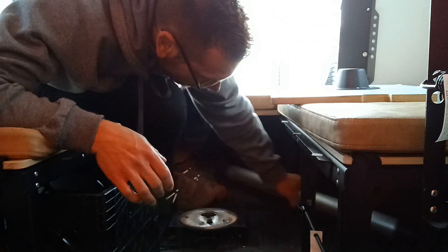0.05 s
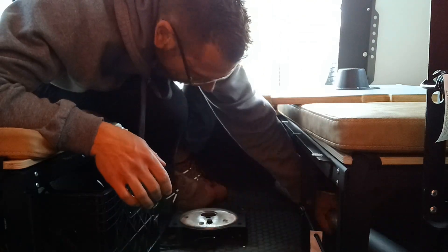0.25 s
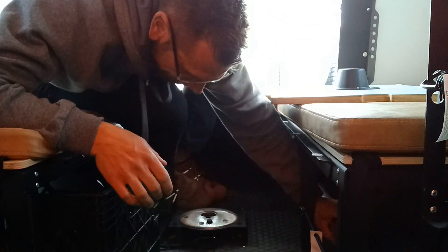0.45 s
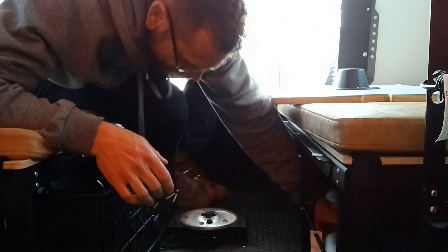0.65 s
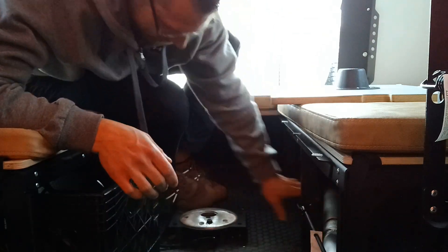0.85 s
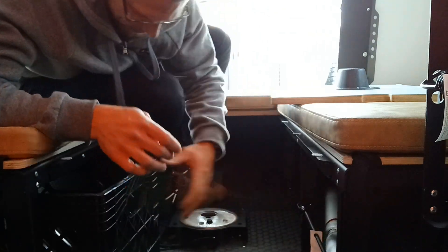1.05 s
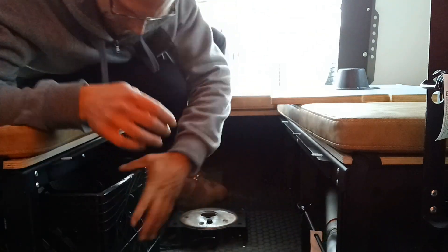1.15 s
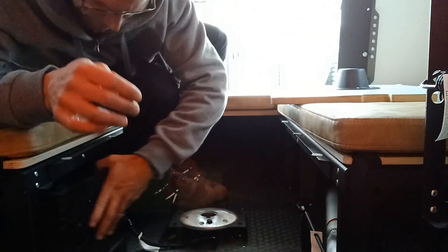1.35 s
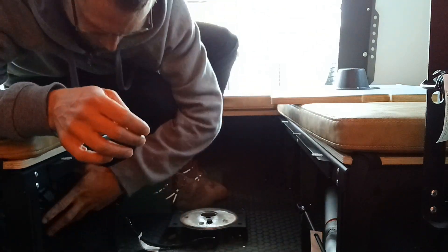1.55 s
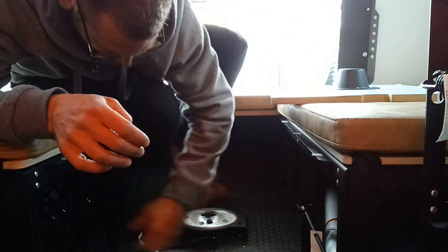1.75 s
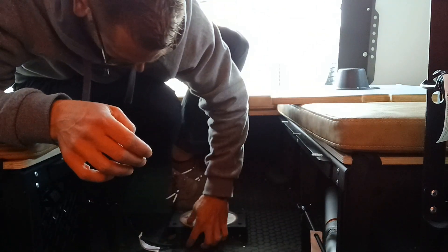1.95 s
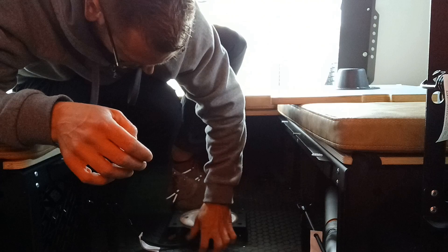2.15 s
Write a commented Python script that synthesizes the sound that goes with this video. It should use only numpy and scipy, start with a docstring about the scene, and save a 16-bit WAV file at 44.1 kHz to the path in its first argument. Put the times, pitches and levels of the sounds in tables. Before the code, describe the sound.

A metal table leg clanks and thumps a hollow floor, then a plastic crate scrapes and knocks

```python
"""Inside a small camper a metal table leg slides out, clanks, bounces and thumps the hollow floor.
A plastic crate is then dragged over the floor mat and knocks against its stop; a hard fitting snaps home.
Rubs are shaped noise over modes driven by random slips; blows are a noise crack over shaken modes.
Thumps are damped panel modes and a steel catch jingles in beating sines.
Two spaced microphones hear the cabin's short diffuse tail over a quiet hum and soft shuffling."""
import sys
import numpy as np
from scipy import signal
from scipy.fft import rfft, irfft
from scipy.io import wavfile
from scipy.ndimage import uniform_filter1d

SR = 44100
rng = np.random.default_rng(int(sys.argv[2]) if len(sys.argv) > 2 else 0)


def field_ratio(decibels):
    """Amplitude ratio for a level in dB (20 dB per decade); scalars and array-likes work."""
    return 10 ** (np.asarray(decibels, dtype=float) / 20)


def dump(signal):
    """Clip the signal to [-1, 1] and save it as 16-bit WAV at the path in sys.argv[1]."""
    limited = np.clip(np.atleast_2d(signal).T, -1, 1)
    pcm = np.round(limited * 32767).astype(np.int16)
    wavfile.write(sys.argv[1], SR, pcm)


N = 97020  # length [samples]
EVENT = SR // 2  # length of one struck sound [samples]

# Blows: (time [s], nominal peak [dB], brightness [dB per octave], ring against crack [dB], left-right [dB])
LEG_CLANKS = [(0.1996, -12, 2, 3, 3), (0.2047, -11, 0, 1.5, -9), (0.2284, -11.5, 1, -1.5, 2),
              (0.3307, -25, 5, -12, 2), (0.5067, -36, -1, -16, -1), (0.5319, -25, 0.5, -30, -1.5)]
CRATE_KNOCKS = [(1.1867, -34, 3.5, -11, 1.5), (1.5408, -6.5, -0.5, -6, -0.5), (1.5877, -8.5, 0.5, -4, -1.0),
                (1.6188, -28.5, -16, 5, -9), (2.1819, -27, -3, 0.5, -1)]
FITTING_SNAPS = [(1.8871, -5.5, 1, -6, .5), (1.8949, -20, -5.5, 0.5, -4), (2.123, -43, -11.5, 4, 5)]
# Thumps on the hollow floor; the deep rows near 0.37, 0.44, 0.53 and 0.66 s give the low rumble under the
# shuffling: # (time [s], peak [dB], panel pitch [Hz], shudder [s], left-right [dB])
FLOOR_THUMPS = [(.2, -30.5, 129, 0.048, -3), (.281, -20.5, 577, 0.022, -1), (0.283, -11, 222, 0.019, -5.5),
                (0.285, -20.5, 111, 0.057, -3), (0.322, -15, 170, .012, -3), (.345, -22.5, 174, 0.038, -3),
                (.35, -37, 520, 0.021, -2), (0.367, -29, 70, 0.029, 2), (0.399, -26, 176, 0.013, -5),
                (.44, -35.5, 110, 0.079, -1), (.537, -21, 213, 0.02, 2), (0.54, -15.5, 148, 0.047, -4),
                (0.561, -16, 84, 0.035, 1), (0.606, -28, 155, 0.031, -6), (.53, -28, 49.3, 0.041, -1),
                (0.658, -32.5, 50, .06, -2), (0.724, -32, 92, 0.038, 1), (1.204, -32.5, 122.4, 0.09, -4),
                (1.256, -23.5, 69.4, 0.025, -2.5), (1.352, -38, 114, 0.029, -9),
                (1.451, -39, 109, 0.066, -10), (1.625, -25, 380, 0.041, -3), (1.699, -32, 300, 0.017, -7),
                (1.777, -30, 87.5, 0.055, -1.5), (1.91, -33.5, 80, .05, 1), (1.992, -36, 95.5, 0.045, -4),
                (2.13, -63, 95, 0.03, -1)]
# Steel catch on the leg: (time [s], level [dB], brightness [dB per octave], left-right [dB])
CATCH_JINGLES = [(.3305, -33, 0, 0), (.376, -51, 6, 0)]

# Courses of the leg passing the cabinet, the crate on the mat, and clothes and limbs:
# (time [s], level [dB], brightness [dB per octave])
SLIDE_COURSE = [(0, -44.5, 3.5), (.025, -43.5, 0.5), (.055, -37, -0.5), (.09, -46.5, -1.5), (.14, -57, -3),
                (.19, -73, -3)]
DRAG_COURSE = [(1.15, -70, 5), (1.199, -44.5, -5), (1.233, -31.5, -2.5), (1.3, -33, -5), (1.325, -28.5, 1),
               (1.361, -22, -1), (1.42, -23, .5), (1.48, -20.5, 0), (1.535, -23, 0), (1.6, -26, -4),
               (1.645, -30, 0), (1.7, -34, -5), (1.76, -47.5, -17), (1.821, -44.5, -8), (1.88, -77, -9.5)]
SHUFFLE_COURSE = [(0, -35, 3), (.06, -48.5, -12), (.12, -46, 0), (.19, -53.5, -1), (.45, -48.5, 1.5),
                  (.7, -51.5, 2.5), (.9, -58, -0.5), (1.05, -54, 2), (1.169, -48.5, 3.5), (1.3, -43, 6),
                  (1.7, -40, 1), (1.88, -43, -1), (2.05, -40, -1.5), (2.2, -36.5, 1)]

# Relative noise spectra: (frequency [Hz], density [dB per Hz])
HUM_SPECTRUM = [(20, -18), (49, 11.5), (90, -12.5), (125, -21), (165, -1), (300, -12.5), (750, -18),
                (840, -11), (1650, -13.5), (2400, -25), (3230, -50), (6000, -38.5), (9500, -52.5),
                (12500, -35.5), (15300, -46), (16500, -63)]
SHUFFLE_SPECTRUM = [(18, -47), (30, -29), (86, 6), (176, -20.5), (217, -29), (248, -13.5), (420, -11.5),
                    (953, -6.5), (13400, -42), (16500, -42)]
SLIDE_SPECTRUM = [(120, -53), (200, -11), (382, -12.5), (468, -22), (844, -5.5), (1220, -14), (1360, -3.5),
                  (2600, -5.5), (4450, -17), (13500, -37.5), (15600, -36), (16500, -63)]
LEG_SPECTRUM = [(88, -42), (150, -22), (606, -5), (709, -14.5), (1530, -10.5), (2310, -14), (3490, -15),
                (4250, -20), (13300, -29.5), (15600, -33.5), (16500, -73)]
DRAG_SPECTRUM = [(24, -21), (40, -5), (145, -4), (300, -17.5), (593, -3), (823, -11), (1140, -9),
                 (1710, -14), (1840, -12), (12800, -37.5), (15300, -40), (16500, -70)]
CRATE_SPECTRUM = [(88, -51), (150, -27), (231, -10.5), (417, -12), (669, -0.5), (830, -9), (1140, -2),
                  (2180, -11.5), (4690, -7), (12800, -25.5), (15600, -28), (16500, -65.5)]
SNAP_SPECTRUM = [(150, -34), (330, -16), (450, -17), (900, -5), (1150, -3), (1700, -9), (2250, -10.5),
                 (2500, -22.5), (3000, -12), (3950, -6.5), (4400, -13), (5600, -4.5), (6200, -14),
                 (8500, -16.5), (10000, -23), (12500, -17), (15600, -29), (16500, -55)]

# Modes of tubular leg, floor, catch, crate and fitting:
# (frequency [Hz], relative level [dB], decay time t60 [s])
LEG_MODES = [(358, -8.5, 0.12), (470, 2, 0.027), (617, -16, .12), (616, -4.5, .12), (995, -11.5, .08),
             (1196, -12, .15), (1280, -29, .08), (1440, -11, .08), (1543, -1.5, 0.36), (1810, -3, .07),
             (2420, -26, 0.041), (3430, -10, .08), (5530, -11, .06), (7200, -24, .06)]
FLOOR_MODES = [(47.5, -4.5, 1), (61, 4, .4), (85.2, 2.5, 1), (115.5, 2.5, 0.85), (170.3, -8.5, 0.9),
               (201.7, -6, 0.28), (238, -3.5, 0.55), (310.4, 0, 0.26), (359.2, 13, .15), (440, 6, 0.14),
               (580, -3, .12), (630, -29, .12)]
CATCH_MODES = [(2805, 0, .22), (3580, -11, .16), (4823, -12, .16), (5324, -12, .2), (6923, -11, .26),
               (7400, -13, .1)]
CRATE_MODES = [(520, -22, 0.15), (667, -16, 0.2), (903, -27, 0.24), (1036, -1.5, 0.14), (1132, -0.5, 0.096),
               (1200, 7, 0.027), (1607, -3, 0.15), (2250, -7, .06), (3600, -0.5, 0.038),
               (4030, -0.5, 0.032), (4850, 0, 0.061), (5230, -24, 0.064), (5220, -14, .08)]
FITTING_MODES = [(347.4, -16, 0.32), (520, -17, 0.38), (615, -11, 0.34), (735, -10, 0.23), (990, -15, 0.16),
                 (986, -5, 0.14), (1112, 2.5, 0.24), (1704, 3, 0.18), (2229, -25, .09), (3800, 1, 0.12),
                 (4683, -10, .12), (5180, -5, .14), (5730, -9, .13), (7360, -5, 0.22)]

# Diffuse decay of the cabin: (frequency [Hz], decay time t60 [s])
CABIN_DECAY = [(150, 0.18), (400, 0.48), (1000, 0.22), (2500, 0.23), (5000, .17), (9000, .13),
               (12500, 0.14), (16000, 0.083)]
# Agreement of the two microphones: (frequency [Hz], left-right likeness [0 to 1])
LIKENESS = [(60, 0.91), (150, 0.89), (300, 0.53), (600, 0.28), (1200, 0.24), (16000, .0)]

HUM_DB = -48.5
SLIDE_RING_DB, DRAG_RING_DB = -10.5, -10.5  # modes against rasp
SLIPS_PER_S, SLIP_SPREAD_DB = 3000, 1.5
LEG_RISE_S, LEG_RATTLE_S = 0.0022, 0.02
CATCH_RISE_S, CATCH_RATTLE_S = 0.00072, 0.012
CRATE_RISE_S, CRATE_RATTLE_S = 0.00067, 0.011
SNAP_RISE_S, SNAP_RATTLE_S = 0.00079, 0.0058
STRIKE = 0.74  # first contact against the rattle
MODE_SPLIT = 0.003  # nominal spacing in a cluster of three, as a share of frequency
LATE_DB, LATE_STRETCH = -8.5, 1.64  # a fainter, slower second tail
CRACK_CUT_HZ, LOW_CUT_HZ = 231, 37
THUMP_REACH_OCT = 0.5  # distance from the panel pitch at which modes are 6 dB weaker
THUMP_RISE_S, DAMP_S, DAMPED_DB = 0.0036, 0.0036, -14
CEILING = 1.1  # amplitude approached by the rounded peaks


def evened(x):
    """Energy normalisation: scale to unit root mean square."""
    return x / np.sqrt(np.mean(x ** 2) + 1e-20)


def read(points, hz):
    """Interpolate along a nearly logarithmic frequency axis."""
    f, value = np.transpose(points)
    return np.interp(np.log(hz + 1), np.log(f + 1), value)


def octaves(hz):
    """Logarithmic pitch: distance from about 1 kHz, compressed in the deep bass."""
    return np.log2((hz + 30) / 1000)


def bins_and_frames(length, size):
    """Time-frequency grid: bin frequencies [Hz] and frame times [s]."""
    hz = np.fft.rfftfreq(size, 1 / SR)[:, None]
    return hz, np.arange(length * 4 // size + 2) * size / 4 / SR


def pair(db, size):
    """Spatial coherence: noise shaped by bins x frames [dB], alike at both microphones mainly in the bass."""
    a, b, c, d = rng.standard_normal((db.shape[1], db.shape[0], 4)).T
    same = np.clip(read(LIKENESS, np.fft.rfftfreq(size, 1 / SR)), 0, 1)[:, None]
    left = a + 1j * b
    right = same * left + np.sqrt(1 - same ** 2) * (c + 1j * d)
    spectrum = np.array([left, right]) * field_ratio(db)
    return signal.istft(spectrum, nperseg=size, noverlap=size * 3 // 4)[1]


def coloured(x, spectrum, tilt_db):
    """Linear filtering: weight the spectrum and tilt it about 1 kHz."""
    hz = np.fft.rfftfreq(x.shape[1], 1 / SR)
    return irfft(rfft(x) * field_ratio(read(spectrum, hz) + tilt_db * octaves(hz)), x.shape[1])


def above(x, cut_hz):
    """Fourth-order high-pass filtering."""
    return signal.sosfilt(signal.butter(4, cut_hz, "high", fs=SR, output="sos"), x)


def panned(x, db):
    """Interaural level difference: share the decibels between left and right."""
    return x * field_ratio(np.array([[db / 2], [-db / 2]]))


def add(mix, s, sound):
    """Superposition: add a sound at its time, with its end faded to silence."""
    fade = np.clip(np.linspace(8, -0.5, sound.shape[1]), 0, 1)
    part = mix[:, round(s * SR):][:, :sound.shape[1]]
    part += (sound * fade)[:, :part.shape[1]]


def rings(modes, tilt_db, spread_db=2.5):
    """Modal decay: dying clusters of close sines beat, with mode levels varied at every call."""
    t = np.arange(EVENT) / SR
    hz, db, t60 = np.transpose(modes)[:, :, None]
    db = db + tilt_db * octaves(hz) + spread_db * rng.standard_normal(hz.shape)
    beats = 0
    for k in (-1, 0, 1):
        detuned = hz * (1 + MODE_SPLIT * (k + rng.uniform(-0.4, 0.4, hz.shape)))
        beats = beats + np.sin(2 * np.pi * detuned * t) / (1 + abs(k))
    x = (field_ratio(db - 60 * t / t60) * beats).sum(0)
    return x / np.linalg.norm(x)


def shaken(modes, tilt_db, rise_s, rattle_s):
    """Forced vibration: one strike, slightly apart at the microphones, and a brief rattle drive the modes."""
    t = np.arange(EVENT) / SR
    noise = pair(np.zeros((129, SR // 128 + 4)), size=256)[:, :EVENT]
    drive = noise * np.exp(-t / rattle_s) * np.clip(t / rise_s, 0, 1)
    arrivals = rng.integers(20, 50, 2)  # samples
    drive[[0, 1], arrivals] += STRIKE * np.linalg.norm(drive[0])
    ring = signal.fftconvolve(drive, rings(modes, tilt_db)[None], axes=1)[:, :EVENT]
    return ring / np.sqrt(np.mean(ring[:, :SR // 25] ** 2))  # unit rms over 40 ms


def blow(row, spectrum, modes, rise_s, rattle_s):
    """Impact and diffuse decay: a broad crack spreads through the cabin over the object's shaken modes."""
    s, db, tilt_db, ring_db, pan_db = row
    hz, frames = bins_and_frames(EVENT, size=128)
    fall = 60 * frames / read(CABIN_DECAY, hz)
    early = field_ratio(-2 * fall)  # the doubled decibels give powers
    late = field_ratio(2 * LATE_DB - 2 * fall / LATE_STRETCH)
    tail = pair(10 * np.log10(early + late), size=128)[:, :EVENT]
    rise = np.clip(np.arange(EVENT) / SR / rise_s, 0, 1)
    crack = above(coloured(tail, spectrum, tilt_db) * rise, CRACK_CUT_HZ)
    crack = crack / np.sqrt(np.mean(crack[:, :SR // 50] ** 2))  # unit rms over 20 ms
    ring = field_ratio(ring_db - 0.5) * shaken(modes, tilt_db, rise_s, rattle_s)  # 0.5 dB under the table
    return s, panned(field_ratio(db - 9) * (crack + ring), pan_db)  # crack rms 9 dB under the nominal peak


def moving_spectrum(course, spectrum, hz, frames):
    """Time-varying spectrum: tilt a noise colour along its course, the tilt held one octave below 1 kHz."""
    s, _, tilt_db = np.transpose(course)
    return read(spectrum, hz) + np.interp(frames, s, tilt_db) * np.maximum(octaves(hz), -1)


def rub(course, spectrum, modes, ring_db):
    """Stick-slip friction: dense uneven slips give a wide rasp and drive the object's modes under it."""
    hz, frames = bins_and_frames(N, size=512)
    rasp = pair(moving_spectrum(course, spectrum, hz, frames), size=512)[:, :N]
    size = field_ratio(SLIP_SPREAD_DB * np.minimum(rng.exponential(1, (2, N)), 3))
    slips = size * (rng.random((2, N)) < SLIPS_PER_S / SR)
    bumps = np.sqrt(uniform_filter1d(slips ** 2, size=60, axis=1) + 0.028)
    pushes = slips * rng.choice([-1.0, 1.0], (2, N))
    body = signal.fftconvolve(pushes, rings(modes, -1.5, spread_db=3.5)[None], axes=1)[:, :N]
    s, db, _ = np.transpose(course)
    level = field_ratio(np.interp(np.arange(N) / SR, s, db, left=-120, right=-120))
    return level * (evened(rasp * bumps) + field_ratio(ring_db) * evened(body))


def hum():
    """Stationary noise: a fixed spectrum with low-frequency peaks gives a steady hum."""
    hz, frames = bins_and_frames(N, size=1024)
    return field_ratio(HUM_DB) * evened(pair(read(HUM_SPECTRUM, hz) + 0 * frames, size=1024)[:, :N])


def shuffle():
    """Random friction: clothes and limbs rustle as noise with smooth patches in time and frequency."""
    hz, frames = bins_and_frames(N, size=1024)
    patches = rng.standard_normal((len(frames), len(hz))).T
    patches = uniform_filter1d(patches, size=30, axis=0)
    patches = evened(uniform_filter1d(patches, size=8, axis=1))
    field = moving_spectrum(SHUFFLE_COURSE, SHUFFLE_SPECTRUM, hz, frames) + 4.7 * patches  # dB
    s, db, _ = np.transpose(SHUFFLE_COURSE)
    return evened(pair(field, size=1024)[:, :N]) * field_ratio(np.interp(np.arange(N) / SR, s, db))


def leg_slide():
    """Stick-slip friction: the leg slides out past the cabinet."""
    return rub(SLIDE_COURSE, SLIDE_SPECTRUM, LEG_MODES, SLIDE_RING_DB)


def leg_clank(row):
    """Impact excitation: a blow rings the metal tube."""
    return blow(row, LEG_SPECTRUM, LEG_MODES, LEG_RISE_S, LEG_RATTLE_S)


def floor_thump(s, db, panel_hz, shudder_s, pan_db):
    """Damped resonance: panels near one pitch shudder freely, then the load on them damps the ring."""
    t = np.arange(EVENT) / SR
    hz, mode_db, t60 = np.transpose(FLOOR_MODES)[:, :, None]
    mode_db = mode_db - 6 * (np.log2(hz / panel_hz) / THUMP_REACH_OCT) ** 2
    phase = 2 * np.pi * rng.random(hz.shape) + 0.22 * rng.standard_normal((2, len(hz), 1))
    decay = field_ratio(mode_db - 60 * np.maximum(t - shudder_s, 0) / t60)
    x = (decay * np.sin(2 * np.pi * hz * t + phase)).sum(1)
    damping = field_ratio(DAMPED_DB * np.clip((t - shudder_s) / DAMP_S, 0, 1))
    x = x * np.clip(t / THUMP_RISE_S, 0, 1) * damping
    return s, panned(field_ratio(db) * x / abs(x).max(), pan_db)


def catch_jingle(s, db, tilt_db, pan_db):
    """Forced vibration: a brief rattle shakes the high modes of the small steel catch."""
    return s, panned(field_ratio(db) * shaken(CATCH_MODES, tilt_db, CATCH_RISE_S, CATCH_RATTLE_S), pan_db)


def crate_drag():
    """Stick-slip friction: the plastic crate rasps over the floor mat."""
    return rub(DRAG_COURSE, DRAG_SPECTRUM, CRATE_MODES, DRAG_RING_DB)


def crate_knock(row):
    """Impact excitation: a knock shakes the modes of the plastic crate."""
    return blow(row, CRATE_SPECTRUM, CRATE_MODES, CRATE_RISE_S, CRATE_RATTLE_S)


def fitting_snap(row):
    """Impact excitation: a short, bright blow rings the hard fitting."""
    return blow(row, SNAP_SPECTRUM, FITTING_MODES, SNAP_RISE_S, SNAP_RATTLE_S)


def scene():
    """Superposition: all sources add linearly in the cabin."""
    mix = hum() + shuffle() + leg_slide() + crate_drag()
    for row in LEG_CLANKS:
        add(mix, *leg_clank(row))
    for row in FLOOR_THUMPS:
        add(mix, *floor_thump(*row))
    for row in CATCH_JINGLES:
        add(mix, *catch_jingle(*row))
    for row in CRATE_KNOCKS:
        add(mix, *crate_knock(row))
    for row in FITTING_SNAPS:
        add(mix, *fitting_snap(row))
    return mix


def band_limit(x):
    """A steep low-pass at the top of the band."""
    return signal.sosfilt(signal.butter(12, 16870, fs=SR, output="sos"), x)


def record(dry):
    """Transducer limits: the microphones cut the deepest bass and round off the highest peaks."""
    mix = CEILING * np.tanh(above(dry, LOW_CUT_HZ) / CEILING)
    return band_limit(mix)


dry = scene()
out = record(dry)
dump(out)
```